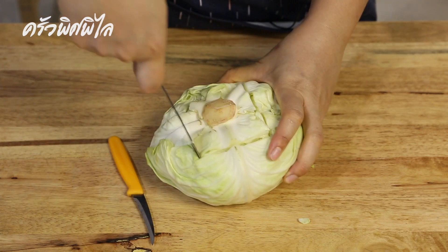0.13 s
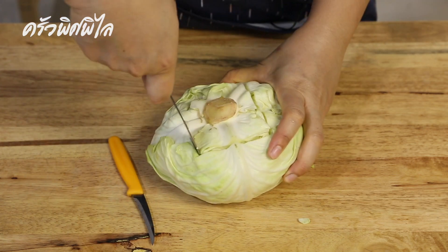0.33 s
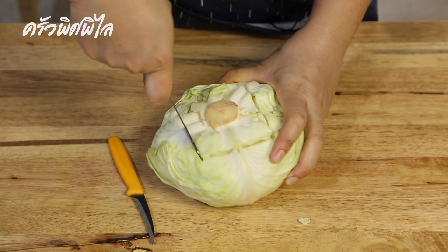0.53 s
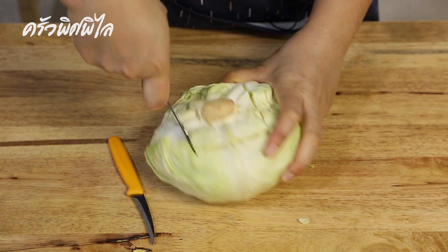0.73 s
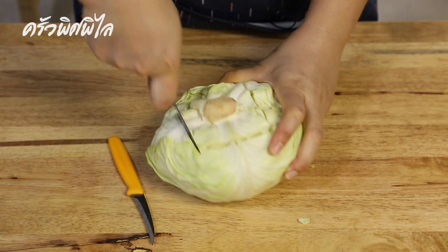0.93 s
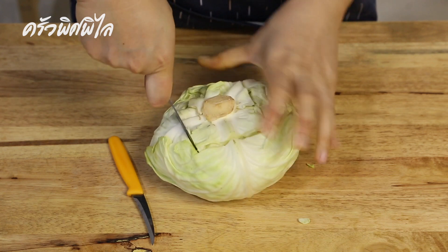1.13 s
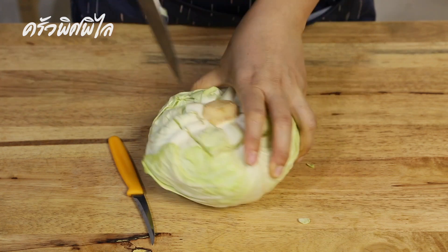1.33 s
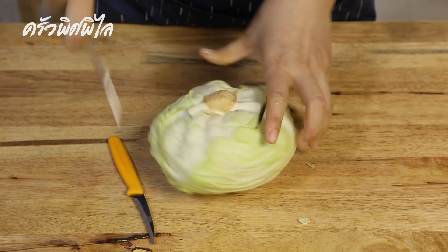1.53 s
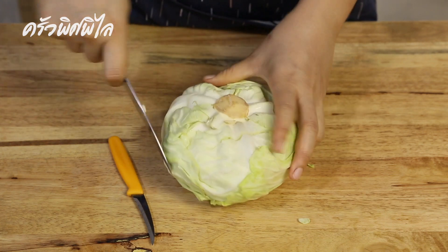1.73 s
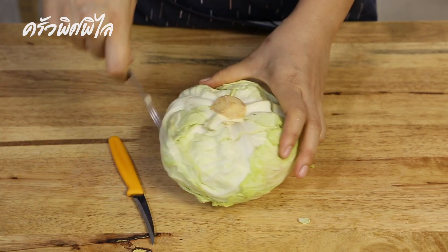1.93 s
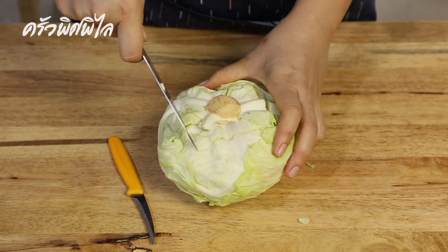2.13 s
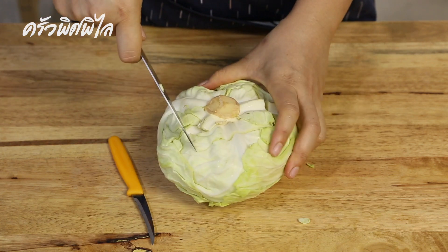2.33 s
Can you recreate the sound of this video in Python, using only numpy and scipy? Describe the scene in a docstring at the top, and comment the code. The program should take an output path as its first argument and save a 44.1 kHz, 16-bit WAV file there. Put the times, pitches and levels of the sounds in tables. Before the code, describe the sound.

A knife crunches into raw cabbage, close, in a small, lightly reverberant kitchen. Faint ticks and a short crunch come at 0.2 s, a stronger one at 0.4 s, then the loudest sharp snaps and wet crackling at 0.55-0.8 s over low board rumble. Weaker crunches fade by 1.25 s. The level dips near 1.37 s; a soft leafy rub follows at 1.55 s, then a faint tap at 1.87 s and quiet hiss.

```python
"""Room air and a slightly wide hiss, both filtered noise, lie behind a kitchen scene on a wooden board.
First ribs of a raw cabbage snap in short cracks, then a knife pushed in short strokes bursts runs of cells:
random pops, coloured by the leaves and the ringing head. Noise in low modes rumbles as the hand presses the board.
The level dips briefly; then the turned cabbage gives a soft rub of grainy noise. A small room reflects it."""
import sys
import numpy as np
from scipy import signal
from scipy.fft import rfft, irfft
from scipy.io import wavfile
from scipy.ndimage import uniform_filter1d

SR = 44100
rng = np.random.default_rng(int(sys.argv[2]) if len(sys.argv) > 2 else 0)


def bounce(signal):
    """Save signal as a 16-bit WAV file at the path given by the first command-line argument."""
    frames = np.transpose(np.atleast_2d(signal))
    limited = np.clip(frames, -1, 1)
    pcm = np.round(limited * 32767).astype(np.int16)
    wavfile.write(sys.argv[1], SR, pcm)


N = 105840
TIME = np.arange(N) / SR


def from_db(db):
    """Logarithmic level: decibels become an amplitude gain."""
    return 10 ** (np.asarray(db) / 20)


def rms_one(x):
    """Power normalisation: scale to an rms of 1."""
    return x / np.sqrt(np.mean(x ** 2) + 1e-20)


def even(x, span_s):
    """Automatic gain: hold the running rms at 1."""
    power = np.abs(uniform_filter1d(x ** 2, int(span_s * SR)))
    return x / np.sqrt(power + 1e-12)


def level(rows):
    """Envelope: gain over time, interpolated in dB between (s, dB) points."""
    return from_db(np.interp(TIME, *np.transpose(rows)))


def low_pass(x, hz, order=2):
    """Butterworth low-pass: maximally flat below its corner."""
    sos = signal.butter(order, min(hz, SR / 2 - 1), fs=SR, output="sos")
    return signal.sosfilt(sos, x + 1e-18)


def high_pass(x, hz, order=3):
    """Butterworth high-pass: maximally flat above its corner."""
    return signal.sosfilt(signal.butter(order, hz, "high", fs=SR, output="sos"), x)


# tone controls; the bite is the leaves' bright resonance
BASS_HZ, BITE_HZ, TREBLE_HZ = 464, 2610, 4820
BITE_OCTAVES = 0.5


def colour(x, points, bass_db=0, bite_db=0, treble_db=0, bite_hz=BITE_HZ, size=4096):
    """Minimum-phase filtering: a causal kernel of unit power with a given spectrum and three tone controls."""
    hz = np.maximum(np.arange(size // 2 + 1) * SR / size, 1)
    at, db = np.transpose(points)
    db = np.interp(np.log(hz), np.log(at), db)
    db = db + bass_db / (1 + (hz / BASS_HZ) ** 6)
    db = db + bite_db * np.exp(-2 * (np.log2(hz / bite_hz) / BITE_OCTAVES) ** 2)
    db = db + treble_db / (1 + (TREBLE_HZ / hz) ** 6)
    # folding the cepstrum onto positive time gives the minimum phase
    cepstrum = irfft(np.log(from_db(db)))
    cepstrum[1:size // 2] *= 2
    cepstrum[size // 2 + 1:] = 0
    kernel = irfft(np.exp(rfft(cepstrum)))
    return signal.fftconvolve(x, kernel / np.linalg.norm(kernel))[:len(x)]


def resonate(x, modes):
    """Modal superposition: parallel damped resonances, each with its own gain at its peak."""
    out = 0
    for hz, db, t60 in modes:
        radius = np.exp(-np.log(1000) / (t60 * SR))
        poles = [1, -2 * radius * np.cos(2 * np.pi * hz / SR), radius * radius]
        ring = signal.lfilter([1, 0, -1], poles, x + 1e-18)
        out = out + from_db(db) * (1 - radius * radius) / 2 * ring
    return out


def add(out, s, x):
    """Superposition: mix x in at time s."""
    i = int(s * SR)
    out[i:i + len(x)] += x[:N - i]


# Spectra of the room air, the central hiss and its side part.
# Each row: frequency in Hz, relative density in dB per Hz.
AIR = [(25, -12), (60, -45), (100, -16), (180, -6.5), (370, 0), (520, -1.5), (800, 0), (1200, -12.5),
       (2500, -11), (6000, -18.5), (15000, -36)]
HISS = [(100, -8), (1000, 10), (3000, -4), (6000, 0), (9000, -2), (12000, -6.5), (15500, -7)]
HISS_SIDE = [(35, -43), (60, -17), (210, -4), (546, -7), (1120, -20.5), (7720, -9.5), (15500, -11)]
# Rise and fall of the hiss. Each row: time in seconds, level in dB.
HISS_LEVEL = [(0, -62.5), (.28, -61), (.55, -66), (.72, -75), (1.2, -61.5), (1.48, -62), (1.6, -55),
              (2.4, -55.5)]
AIR_DB, HISS_SIDE_DB = -52.5, -5   # the side level is relative to the centre
RUMBLE_CUT_HZ = 56


def background():
    """Stationary and modulated noise: steady central air, and a hiss widened by an opposite-phase side part."""
    air, mid, side = rng.standard_normal((3, N))
    left_right = np.array([[1], [-1]])
    hiss = colour(mid, HISS) + from_db(HISS_SIDE_DB) * colour(side, HISS_SIDE) * left_right
    room_air = from_db(AIR_DB) * colour(air, AIR)
    return high_pass(room_air + level(HISS_LEVEL) * hiss, RUMBLE_CUT_HZ)


# Colour of the crunch, for snaps and strokes alike.
# Each row: frequency in Hz, relative density in dB per Hz.
CRUNCH = [(40, -68), (90, -39), (180, -8.5), (310, -13), (400, -4.5), (500, -1.5), (800, 1.5), (1300, 0.5),
          (2000, -7), (2750, -6), (3900, -16.5), (4800, -14), (7000, -21), (8700, -26), (9700, -24)]
# Single ribs snap, or the blade taps. Each row: start in seconds, length in seconds, relative level in dB,
# bass in dB, bite in dB, treble in dB.
SNAPS = [ (0.173, 0.0024, -43.5, -11, 14, 7), (.192, .002, -43, 10, -4, 2),
         (0.214, 0.0022, -41, 8.5, 2, -10), (.231, 0.0015, -34, 11, 1, -16),
         (0.392, 0.0037, -25.5, -20, 1, -16), (0.441, 0.0024, -28, 3, 10, -1),
         (0.5268, 0.0016, -30, 6, 5, 0), (.5485, .002, -29, -2, 3, 2), (0.5669, 0.0037, -20, 3.5, 3.5, -6),
         (0.5948, 0.00093, -18, -4.5, 1, -6), (.681, 0.0016, -16, -19, 5.5, 5.5),
         (.7135, .0015, -26.5, -24, -8, 1), (0.7383, .004, -26, -3, 1.5, -1),
         (0.784, 0.0037, -30, -19, 1, -12), (1.026, .003, -35, 8, -6, -10),
         (1.038, 0.0041, -32, -7, -9, -29), (1.225, 0.0038, -41, 2, 2, 0),
         (1.869, 0.0073, -35.5, 13.5, -0.5, -3), ]
SNAP_SPAN_S = 0.0055   # span over which a crack's level is counted
SNAP_LAG_S, SNAP_LAG_HZ = .0011, 2200   # the lows of a crack leave the head later than its highs


def snaps(size=2048):
    """Impulsive fracture: a brief crack, levelled over all frequencies and then coloured, its highs first."""
    out, t = np.zeros(N), TIME[:size]
    hz = np.arange(size // 2 + 1) * SR / size
    lag = np.exp(-2j * np.pi * SNAP_LAG_S * SNAP_LAG_HZ * np.arctan(hz / SNAP_LAG_HZ))
    for s, length, db, bass_db, bite_db, treble_db in SNAPS:
        tear = rfft(rng.standard_normal(size) * (t < length))
        white = tear / (np.abs(tear) + 1e-9)   # keeps only the phase
        crack = irfft(lag * white) * (t < length + SNAP_SPAN_S)
        crack = colour(crack, CRUNCH, bass_db, bite_db, treble_db)
        add(out, s, from_db(db) * np.sqrt(SNAP_SPAN_S * SR) * crack / np.linalg.norm(crack))
    return out


# The blade advances. Each row: start in seconds, length in seconds, relative level in dB,
# swell over the stroke in dB, body in Hz, bite in Hz, bass in dB, bite in dB, treble in dB.
STROKES = [ (0.229, 0.041, -33.5, 0.5, 730, 2410, -0.5, 7, 7),
           (.269, 0.0089, -29, -2.5, 520, 2730, 7, -2, 7),
           (0.3913, 0.055, -23.5, -2, 520, 2840, 2.5, 6, 1.5),
           (.451, 0.039, -44.5, -6, 950, 2400, 8, 6, -4), (.5755, 0.027, -22.5, -1, 590, 2670, 0, 4, -1),
           (0.607, 0.023, -27, -1, 616, 2500, 6, -4.5, -6),
           (0.631, 0.05, -35.5, -16, 1100, 2600, 1, -2, -9),
           (0.685, .070, -25, -5, 823, 3300, -0.5, 2.5, 1),
           (0.752, 0.073, -36, -7.5, 1070, 2150, -8, 7.5, -21),
           (0.848, 0.033, -35.5, 3.5, 670, 1910, 0.5, -7, -15),
           (.877, 0.056, -32.5, 4.5, 776, 1780, -8.5, 5, 0.5),
           (.945, 0.03, -43, -3.5, 927, 2000, -20, 11, 4), (1.025, 0.041, -34, 2.5, 720, 2600, -2, 0, -12),
           (1.076, .025, -47, -4, 816, 2400, -8, -7, 0), (1.182, 0.069, -49, -4.5, 776, 2700, 6, -3, 6), ]
BURSTS_PER_S, BURST_SPREAD_DB, BURST_S = 520, 5, 0.00068   # leaf layers give way; each burst decays
TEAR_SHARE = 0.58   # steady tearing between the bursts
CELLS_PER_S = 14000   # popping cells in each band
CELL_BANDS_HZ = np.geomspace(90, 12000, 9)   # band edges
BODY_DB, BODY_T60_S = -0.5, 0.017   # the part of the head being cut rings briefly
EVEN_S = 0.0092   # the hand evens out the pressure over this span
ATTACK_S, RELEASE_S = 0.0016, 0.006
SLIP_DB, SLIP_HZ = 2, 112   # the blade sticks and slips as it goes


def strokes(size=8192):
    """Random point process: layers give way at uneven times, each a spray of popping cells of its own colour."""
    out, t = np.zeros(N), TIME[:size]
    bands = [signal.butter(2, edges, "band", fs=SR, output="sos")
             for edges in zip(CELL_BANDS_HZ, CELL_BANDS_HZ[1:])]
    for s, length, db, swell_db, body_hz, bite_hz, bass_db, bite_db, treble_db in STROKES:
        layers = rng.random(size) < BURSTS_PER_S / SR
        pops = 0
        for band in bands:
            # a separate strength in each band gives every layer its own colour
            strength = from_db(BURST_SPREAD_DB * np.clip(rng.standard_normal(size), -2, 1))
            burst = signal.lfilter([1], [1, -np.exp(-1 / (BURST_S * SR))], layers * strength)
            spray = burst + TEAR_SHARE
            cells = (rng.random(size) < CELLS_PER_S / SR) * rng.standard_normal(size)
            pops = pops + signal.sosfilt(band, spray * cells)
        pops = pops + resonate(pops, [(body_hz, BODY_DB, BODY_T60_S)])
        pops = even(colour(pops, CRUNCH, bass_db, bite_db, treble_db, bite_hz), EVEN_S)
        push = np.minimum(t / ATTACK_S, 1) * np.exp(-np.maximum(t - length, 0) / RELEASE_S)
        wobble = rms_one(low_pass(rng.standard_normal(size), SLIP_HZ))
        slip = from_db(SLIP_DB * np.clip(wobble, -2, 1))
        swell = from_db(db + swell_db * np.minimum(t / length, 1))
        add(out, s, pops * slip * push * swell)
    return out


# Modes of the cabbage head on the board.
# Each row: frequency in Hz, gain in dB, decay by 60 dB in seconds.
HEAD = [(491.3, 1.5, .11), (610.4, -8, 0.082), (741.5, 0.5, 0.041), (780, -22, 0.13), (962, 0.5, 0.064),
        (1152, -7, 0.091), (1290, -20, 0.21), (1482, -12, 0.19), (2250, -12, 0.097), (2620, -10, 0.054),
        (2780, -8.5, 0.081)]
CRUNCH_TOP_HZ = 9830


def head(cut):
    """Forced modal vibration: the cut excites the head, whose ringing joins it under a steep top limit."""
    cut = from_db(-2.5) * (cut + resonate(cut, HEAD))
    return signal.sosfilt(signal.ellip(8, .5, 60, CRUNCH_TOP_HZ, fs=SR, output="sos"), cut)


# Low modes of the board and table.
# Each row: frequency in Hz, relative level in dB, decay by 60 dB in seconds.
BOARD = [(99.7, 1.5, 0.18), (128.6, 1.5, 0.086), (163.5, -1.5, 0.089)]
# Rumble under the pressing hand. Each row: time in seconds, level in dB.
PRESS = [(.34, -88), (.40, -61.5), (.54, -58.5), (.60, -51), (.75, -45), (.83, -58), (.95, -56), (1.0, -68),
         (1.25, -91)]


def board():
    """Random excitation of low modes: the pressing hand shakes the board, as twice-resonated noise."""
    rumble = 0
    for hz, db, t60 in BOARD:
        mode = [(hz, 0, t60)]
        shaken = resonate(resonate(rng.standard_normal(N), mode), mode)
        rumble = rumble + from_db(db) * even(shaken, .07)
    return level(PRESS) * rms_one(rumble)


# Spectrum of the rub as the cabbage is turned.
# Each row: frequency in Hz, relative density in dB per Hz.
RUB = [(100, -31), (250, -12), (420, 2.5), (900, 2), (1400, -0.5), (2500, -8.5), (5500, -15.5),
       (9000, -29.5), (12000, -53)]
RUB_AT_S, RUB_RISE_S, RUB_DECAY_S = 1.535, 0.013, 0.089
RUB_DB, RUB_GRAIN_DB = -37.5, 2.5


def rub():
    """Friction noise: outer leaves drag over the wood in fine grains that start quickly and die away."""
    t = np.maximum(TIME - RUB_AT_S, 0)
    grain = from_db(RUB_GRAIN_DB * rms_one(low_pass(rng.standard_normal(N), 264)))
    drag = np.minimum(t / RUB_RISE_S, 1) * np.exp(-np.maximum(t - RUB_RISE_S, 0) / RUB_DECAY_S)
    return from_db(RUB_DB) * drag * rms_one(colour(grain * rng.standard_normal(N), RUB))


ROOM_T60_S, ROOM_TREBLE_T60_S, ROOM_DB, ROOM_GAP_S = 0.51, 0.54, -10.5, .008
ECHO_S, ECHO_DB, ECHO_HZ = 0.00326, -14.5, 1500   # dull reflection off the board


def tail(x):
    """Diffuse reverberation: decaying noise, treble slightly longer than lows, as strong as its source."""
    t, noise = TIME[:SR], rng.standard_normal(SR)
    lows = low_pass(noise, 3000)
    low_decay = lows * np.exp(-np.log(1000) * t / ROOM_T60_S)
    treble_decay = 0.97 * (noise - lows) * np.exp(-np.log(1000) * t / ROOM_TREBLE_T60_S)
    decay = (low_decay + treble_decay) * (t > ROOM_GAP_S)
    return np.std(x) * rms_one(signal.fftconvolve(x, decay)[:N])


def kitchen(x):
    """Early reflection and reverberation: a close echo off the board, then the room's tail."""
    echo = np.interp(TIME - ECHO_S, TIME, low_pass(x, ECHO_HZ))
    return x + from_db(ECHO_DB) * echo + from_db(ROOM_DB) * tail(x)


LOW_CUT_HZ = 82


def scene():
    """Superposition: cutting, turning and board in the centre, the background around them."""
    cut = head(strokes() + snaps())
    return kitchen(high_pass(cut + rub(), LOW_CUT_HZ)) + board() + background()


DIP_AT_S, DIP_FALL_S, DIP_DB, DIP_RECOVER_S = 1.373, 0.0065, -23.5, 0.035   # lowest at DIP_AT_S
CUTOFF_HZ = 15750


def record(dry):
    """Gain modulation and band limiting: the level dips once, briefly; the top is cut."""
    t = TIME - DIP_AT_S
    depth = np.clip(1 + t / DIP_FALL_S, 0, 1) * np.exp(-np.maximum(t, 0) / DIP_RECOVER_S)
    dip = from_db(DIP_DB * depth)
    return signal.sosfilt(signal.ellip(12, .1, 80, CUTOFF_HZ, fs=SR, output="sos"), dry * dip)


dry = scene()
out = record(dry)
bounce(out)
```